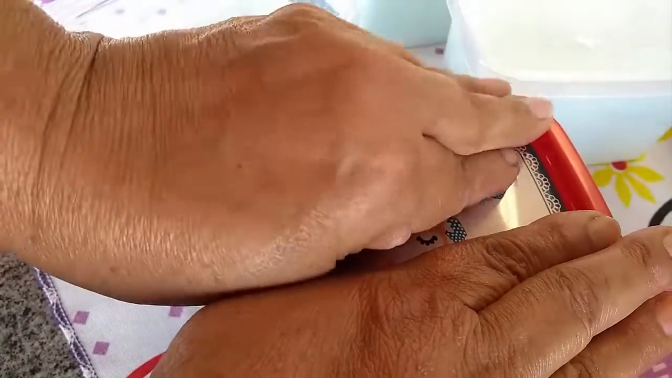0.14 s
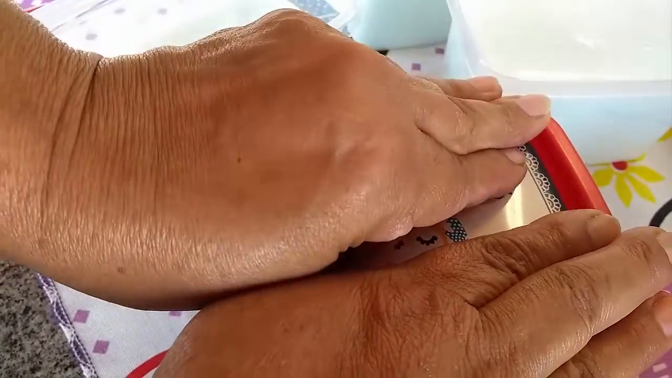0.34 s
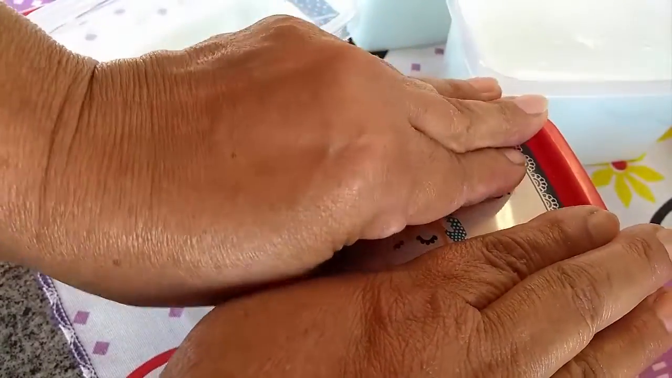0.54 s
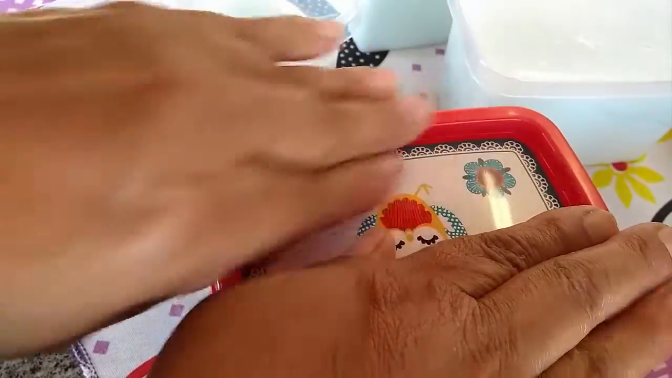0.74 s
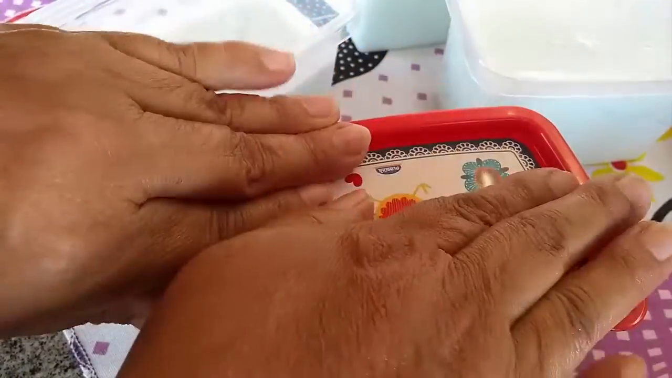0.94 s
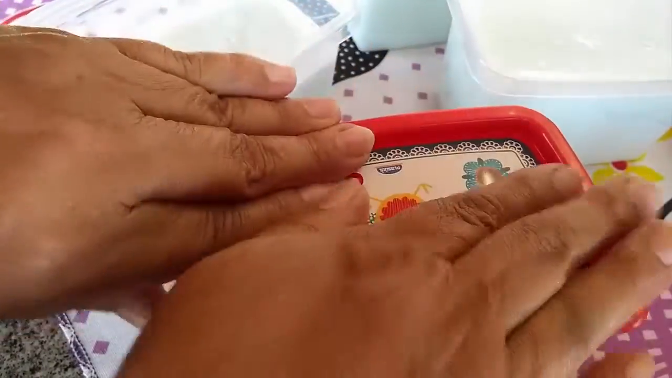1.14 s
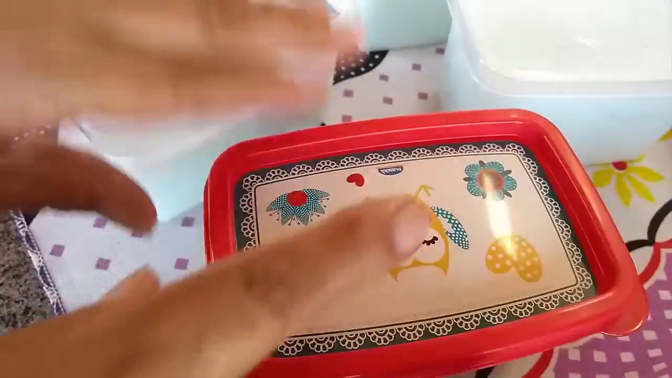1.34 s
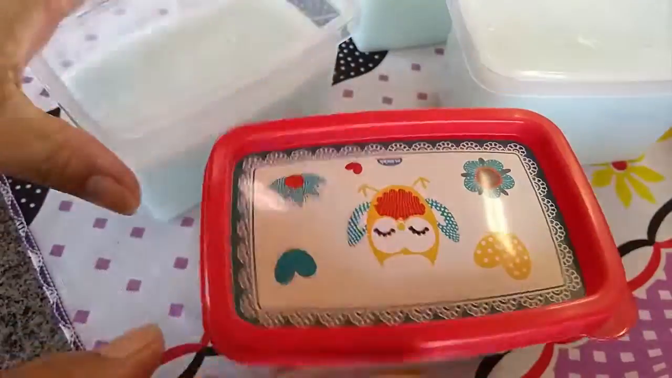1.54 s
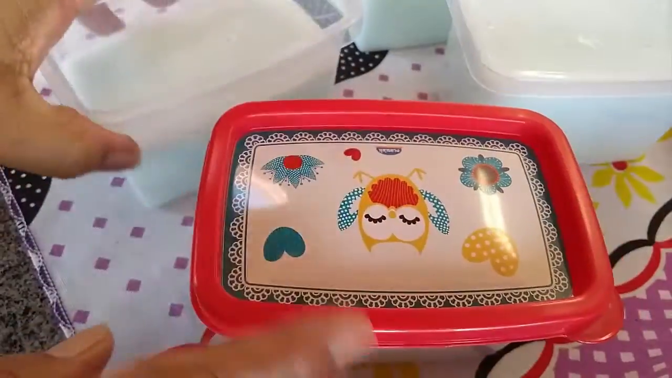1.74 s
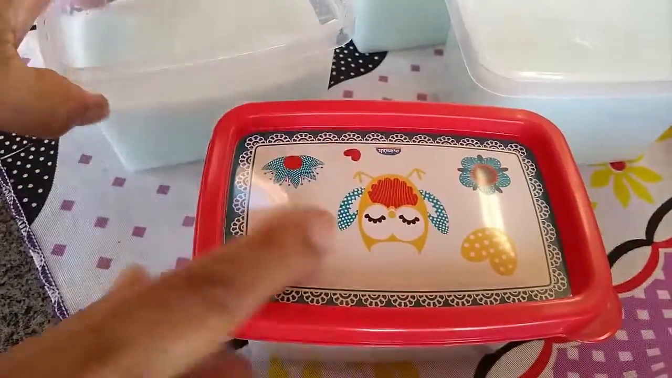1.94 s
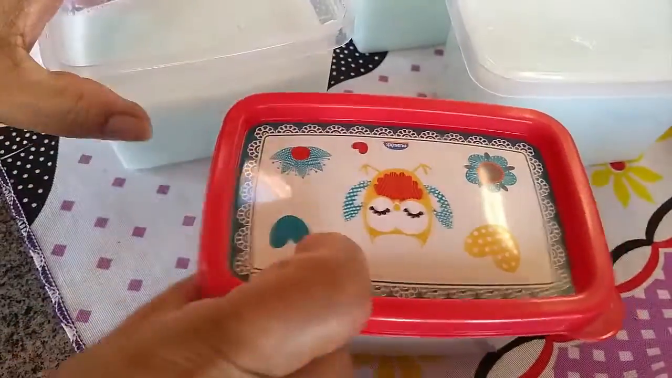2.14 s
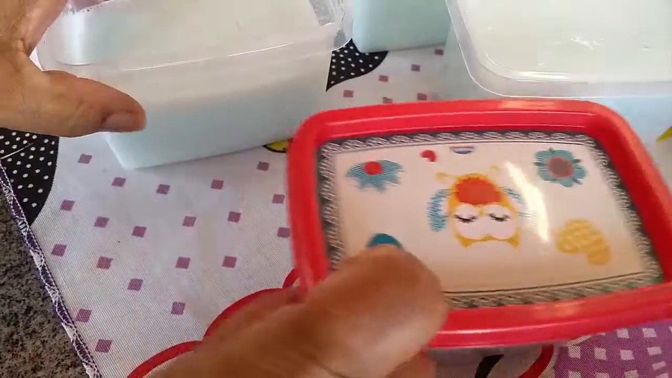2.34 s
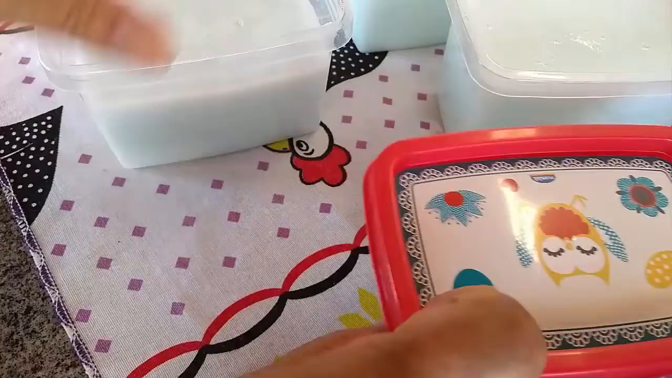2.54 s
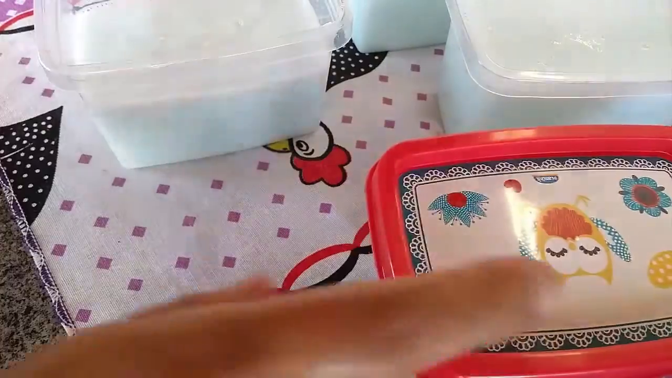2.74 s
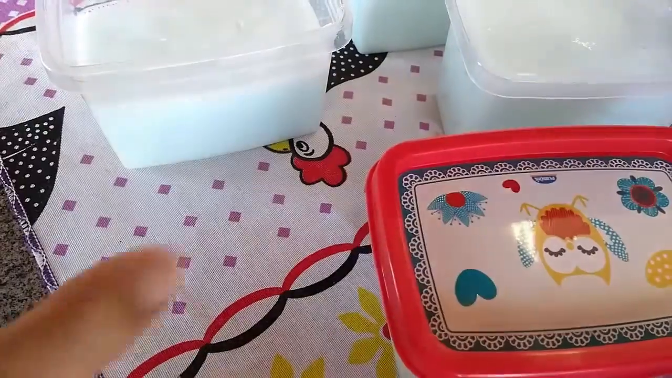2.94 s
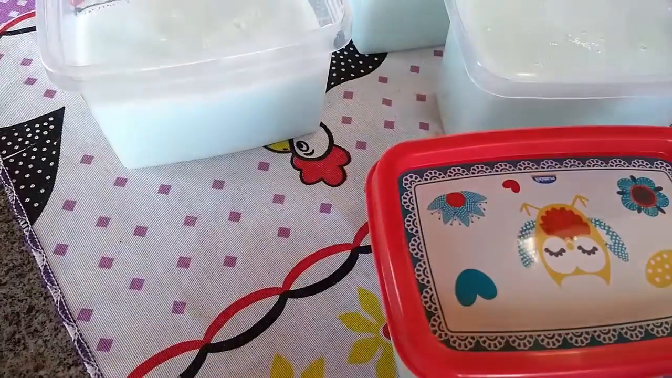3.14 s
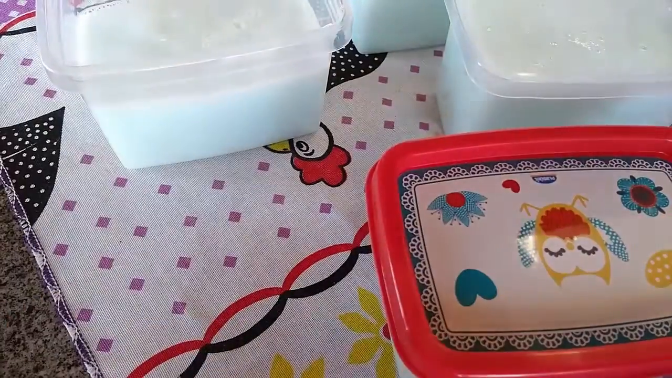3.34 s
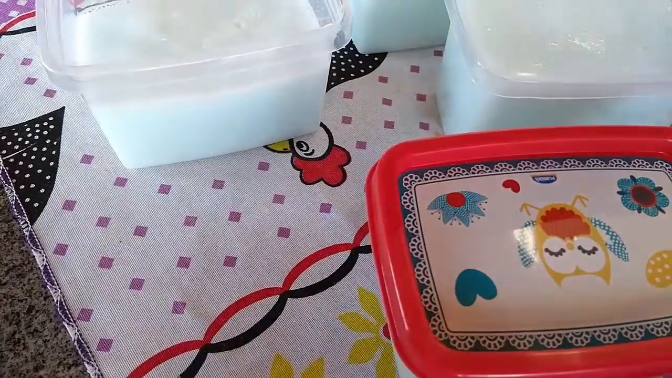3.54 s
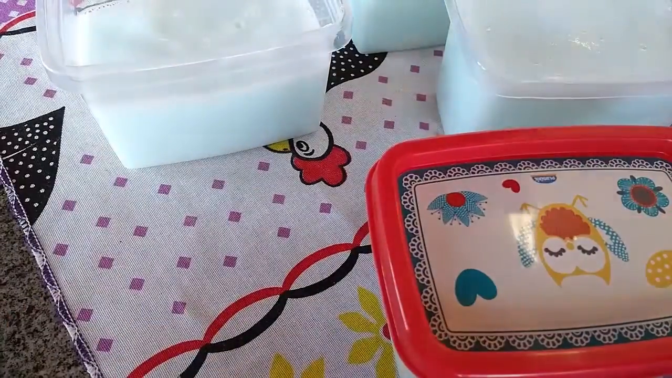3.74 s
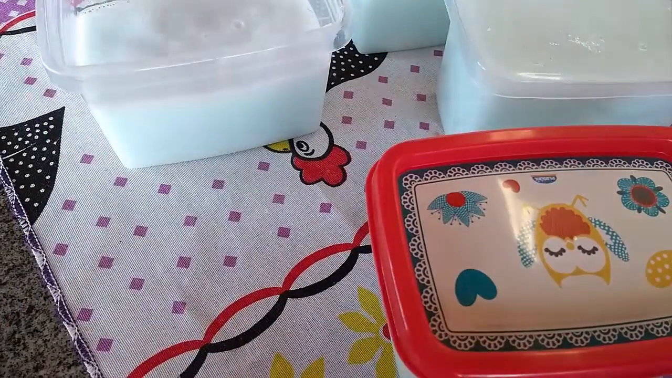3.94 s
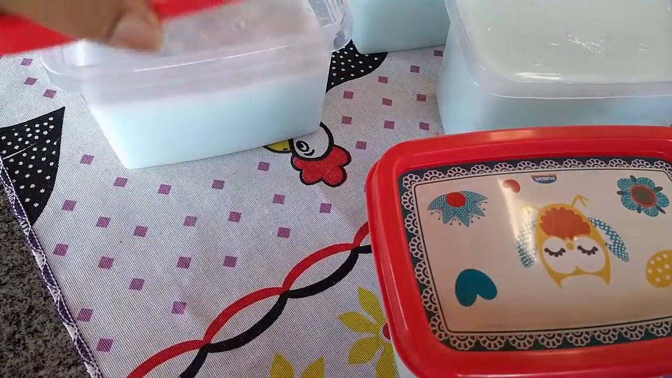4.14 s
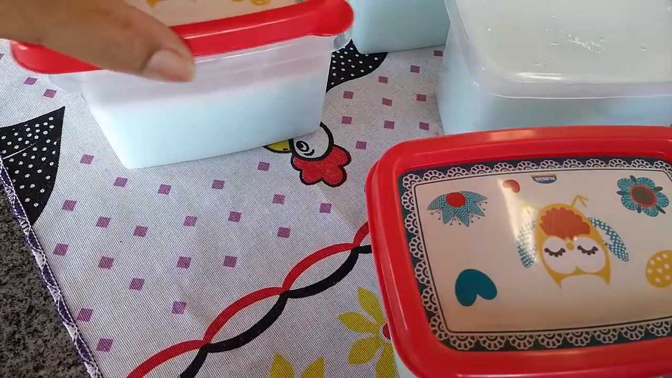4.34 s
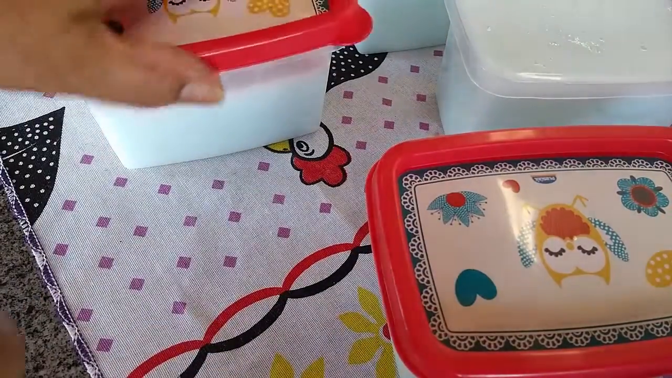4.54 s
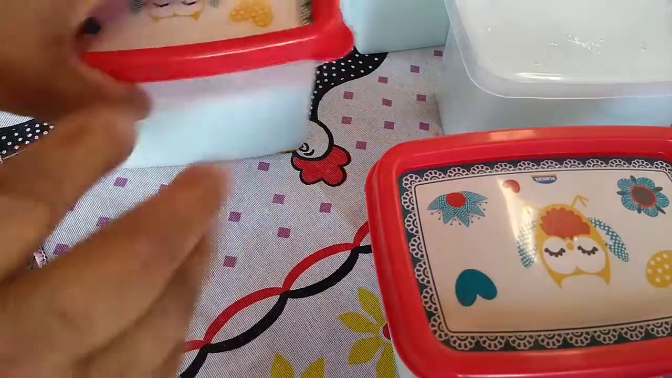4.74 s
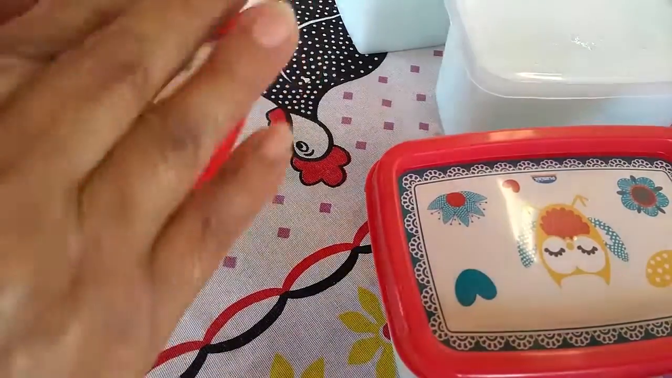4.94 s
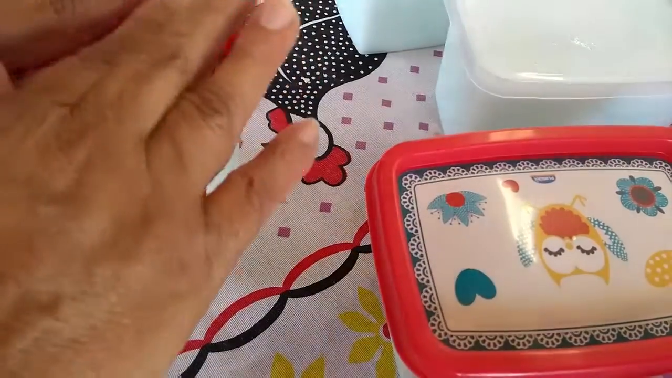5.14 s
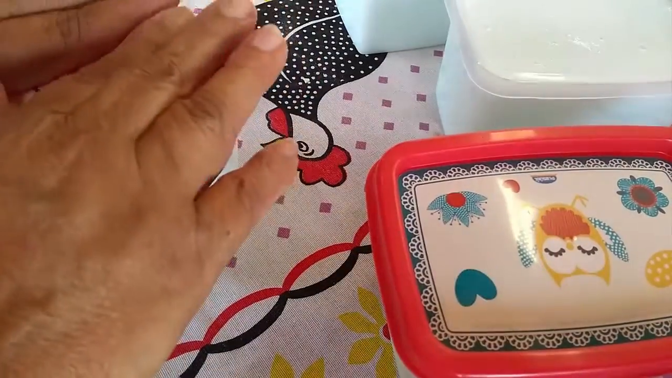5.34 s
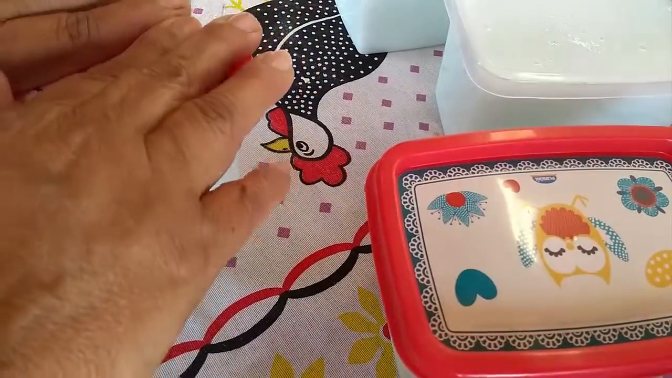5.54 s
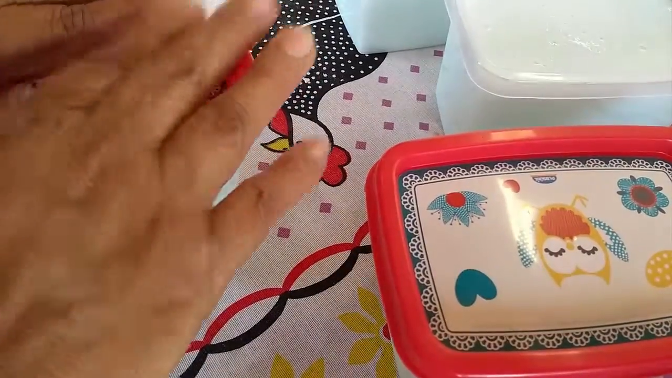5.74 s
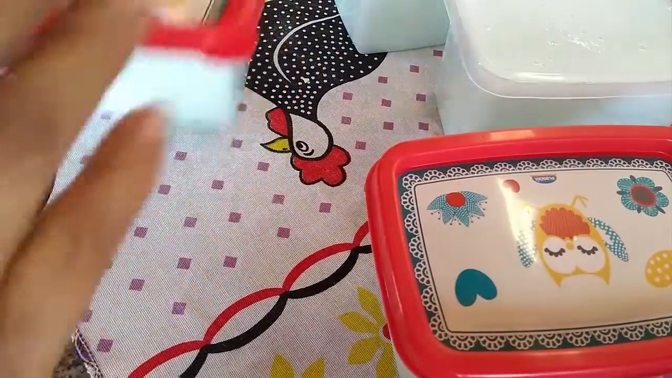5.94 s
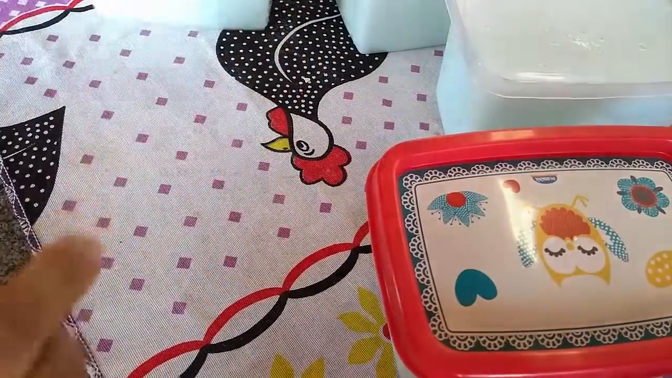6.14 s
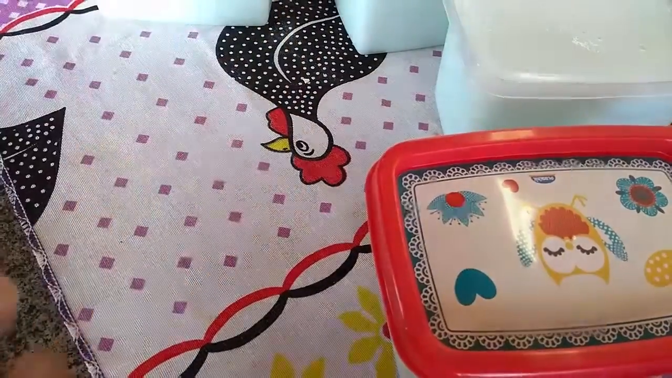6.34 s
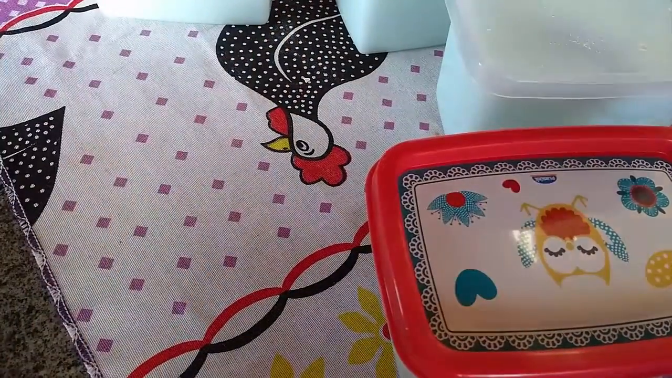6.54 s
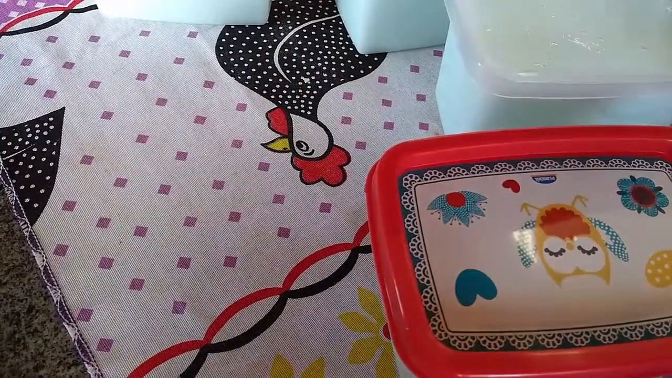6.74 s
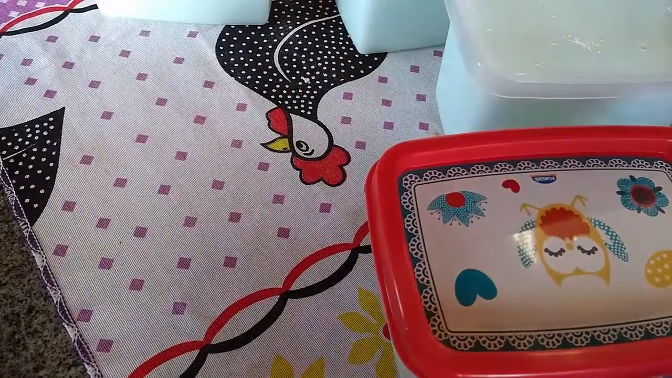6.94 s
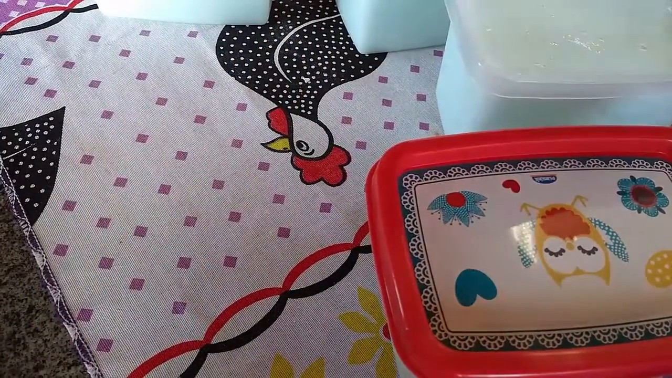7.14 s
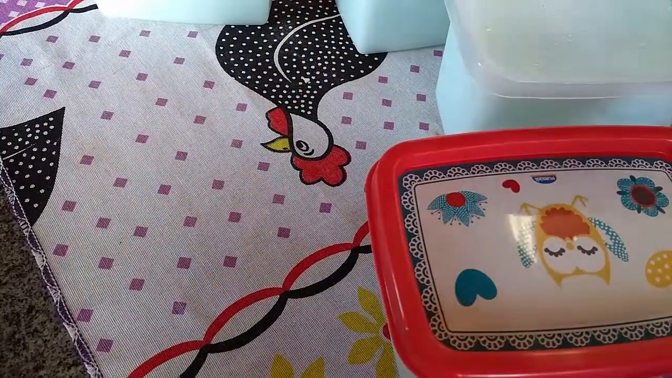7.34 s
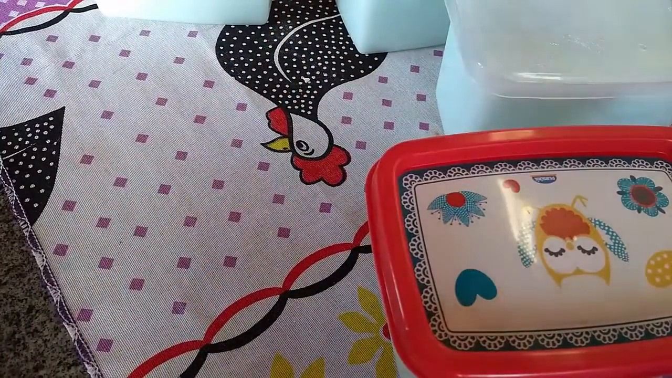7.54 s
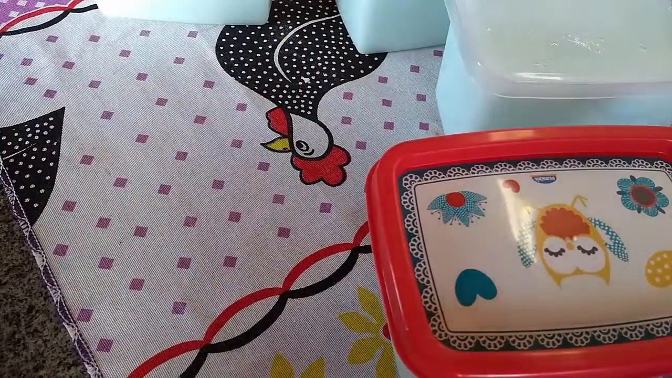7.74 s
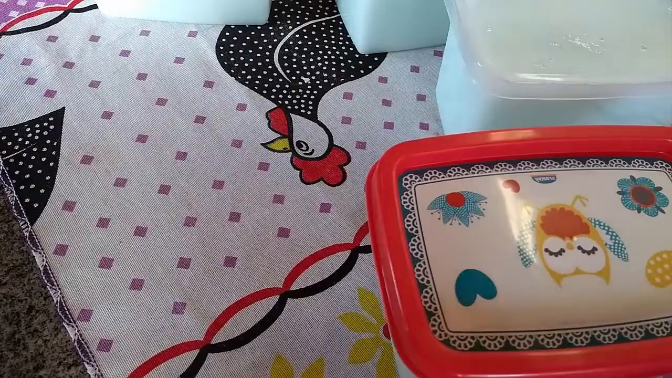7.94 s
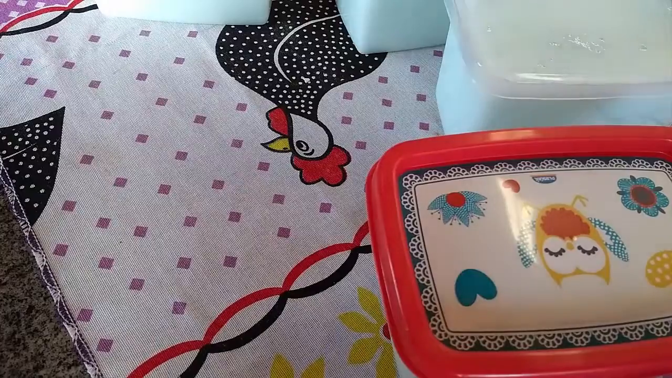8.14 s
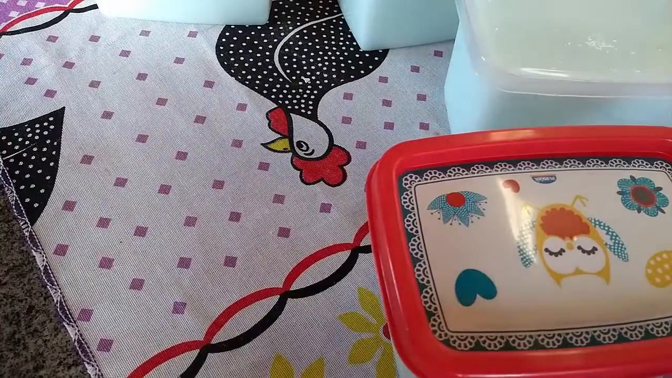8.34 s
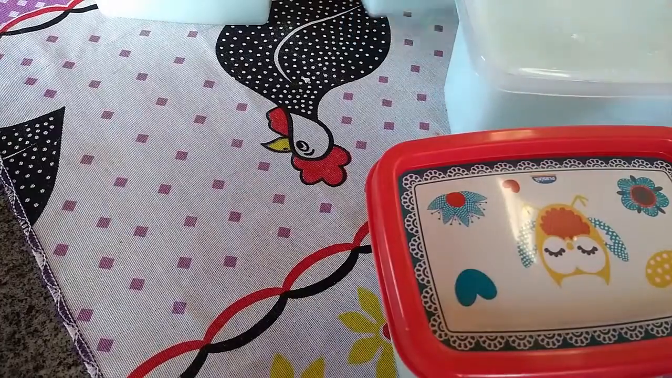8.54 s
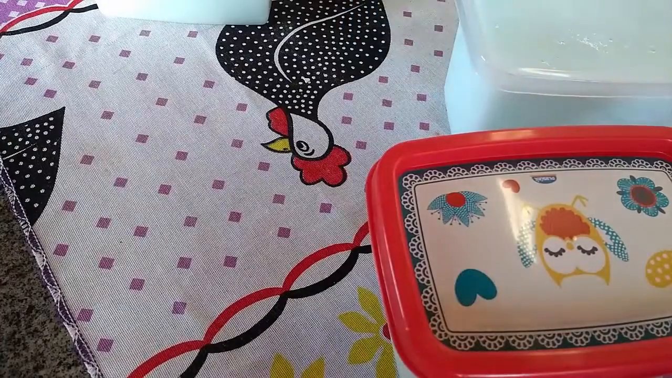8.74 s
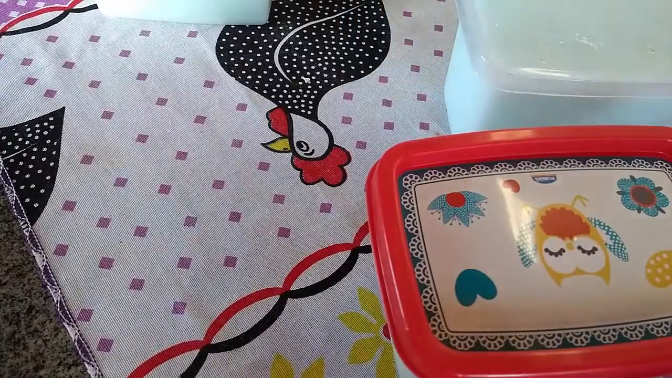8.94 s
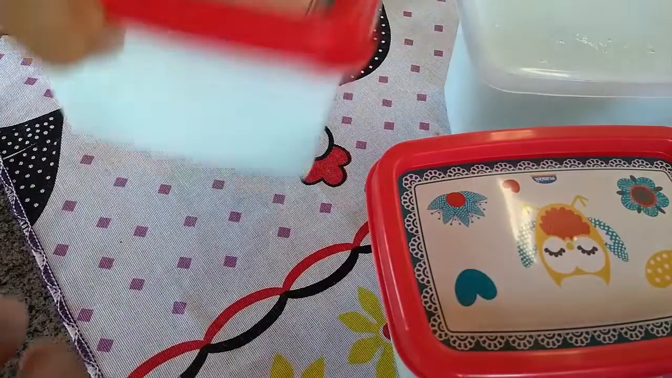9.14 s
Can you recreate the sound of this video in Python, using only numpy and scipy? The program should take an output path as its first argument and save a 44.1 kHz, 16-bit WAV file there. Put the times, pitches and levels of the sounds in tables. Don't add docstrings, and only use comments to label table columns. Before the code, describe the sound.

Close handling of plastic tubs: rims click shut, lids clack and rub, tubs drag on cloth, while a distant engine passes outside.

```python
import sys
import numpy as np
from scipy import signal
from scipy.fft import rfft, irfft, next_fast_len
from scipy.io import wavfile
from scipy.ndimage import uniform_filter1d, map_coordinates

SR = 44100
rng = np.random.default_rng(int(sys.argv[2]) if len(sys.argv) > 2 else 0)


def elevation(decibels):
    levels = np.asarray(decibels, float)
    return 10 ** (levels / 20)


def int16_out(signal):
    q = np.round(np.clip(np.atleast_2d(signal).T, -1, 1) * 32767)
    wavfile.write(sys.argv[1], SR, q.astype(np.int16))


N = 409688
SIZE = next_fast_len(N)
TIME = np.arange(N) / SR
HZ = np.arange(SIZE // 2 + 1) * SR / SIZE

# time in seconds, lead at the left microphone in ms, left minus right in dB.
HAND_PLACE = [(0, 0.078, 4.5), (.45, 0.16, 6.5), (2.9, 0.21, 0.5), (3.1, -0.18, 6.5), (3.6, -0.31, 7),
              (4.2, 0.2, -1.5), (5, 0.22, 5), (5.9, .19, 0.5), (6.2, -0.011, 3), (6.8, -0.095, -1),
              (7.1, -.17, 0.5), (7.25, 0.22, 2), (7.5, -0.027, 0.5), (7.9, 0.0037, 6.5), (9.3, -0.16, -12)]


def unit(x):
    return x / np.sqrt(np.mean(x ** 2))


def noise(gain):
    phase = 2 * np.pi * rng.random(len(HZ))
    return irfft(gain * np.exp(1j * phase), SIZE)[:N] * np.sqrt(SIZE)


def humps(peaks):
    return sum(elevation(db) / (1 + ((HZ - hz) / width) ** 2) ** 2 for hz, width, db in peaks)


def walk(rate):
    hold = int(SR / rate)
    steps = np.repeat(rng.standard_normal(N // hold + 1), hold)
    return 1.19 * uniform_filter1d(uniform_filter1d(steps, hold), hold)[:N]


def curves(table):
    s, *columns = np.transpose(table)
    return [np.interp(TIME, s, column) for column in columns]


def engine_gear(track, orders):
    hz, level_db = curves(track)
    fade = np.clip(np.minimum(TIME - track[0][0], track[-1][0] - TIME) / 0.13, 0, 1)
    turn = 2 * np.pi * np.cumsum(hz * (1 + 0.0022 * walk(4.98))) / SR
    mic_lag = np.array([[0], [.25]])
    out = 0
    for multiple, order_db in orders:
        gain = elevation(level_db + 7.0 + order_db + 2.0 * walk(6))
        out = out + gain * np.sin(multiple * (turn - mic_lag))
    return fade * out


def engine():
    # time in seconds, strongest order in Hz, level in dB.
    pull = [(3.3, 138, -87), (3.45, 139, -70.5), (3.8, 139.3, -71), (4, 140.5, -64), (4.3, 141.5, -67),
            (4.62, 142, -65.5), (4.73, 140, -72), (4.82, 131, -76), (4.9, 127, -73)]
    cruise = [(4.9, 123.7, -74), (5.1, 120.6, -59), (5.6, 121.9, -67.5), (6, 121.8, -71.5),
              (6.47, 123.2, -64), (6.7, 122, -76)]
    # multiple of the strongest order, level in dB.
    pull_orders = [(.5, -4), (1, 10.5), (2, -15), (6, -11), (6.5, -5)]
    cruise_orders = [(1, 2), (1.5, 0), (2, -19)]
    return engine_gear(pull, pull_orders) + engine_gear(cruise, cruise_orders)


def street():
    # frequency in Hz, density in dB per Hz.
    spectrum = [(30, -14), (60, -5.5), (90, 1), (150, -4.5), (260, -2.5), (400, -5), (550, -15), (850, -15),
                (1100, -18.5), (1800, -21.5), (2400, -28), (5000, -33), (9000, -39.5), (14200, -42.5),
                (15000, -70)]
    # frequency in Hz, width in Hz, level in dB.
    air_modes = [(142.8, 13.3, 5.5), (252.7, 39.6, 0.5)]
    # time in seconds, level in dB.
    traffic = [(.3, 1.9), (.9, -5.5), (1.3, 0.77), (1.9, 0), (2.45, 4.5), (2.75, 0.2), (3.44, 3.5),
               (3.7, 1.5), (4.4, 0.5), (4.75, -1), (5.3, 9.5), (5.7, 8), (6.15, 6), (6.8, 1.5), (7.4, 1.5),
               (8.3, 6), (8.6, -1.5), (9.29, -5.5)]
    # start in seconds, depth in dB.
    ducks = [
        (0.559, -9),
        (5.6, -9.5),
    ]

    attack_s, hold_s, release_s = 0.049, 0.31, 0.91
    duck_times = np.cumsum([0, attack_s, hold_s, release_s])
    duck_db = sum(np.interp(TIME, s + duck_times, [0, db, db, 0]) for s, db in ducks)
    traffic_db = curves(traffic)[0]
    # level in dB, dB gained per dB of traffic
    ranges = ((-60, 0.48), (-55.5, 0.63), (-54, 0.63))
    swell_db = np.array([db + follow * traffic_db + duck_db for db, follow in ranges])

    hz, density_db = np.transpose(spectrum)
    shape = elevation(np.interp(np.log(HZ + 1), np.log(hz), density_db)) * (1 + humps(air_modes))
    travel_s = 0.38 / 1000
    alike = np.clip(0.86 * np.sinc(2 * HZ * travel_s) + 0.0065, -.99, .99)
    out = 0
    for k in range(9):
        octave = np.clip(np.log2((HZ + 1) / 50) - k, -1, 1)
        band = shape * np.cos(octave * np.pi / 2)
        mid = noise(band * np.sqrt(1 + alike))
        side = noise(band * np.sqrt(1 - alike))
        share = np.array([np.interp(k, [3, 4.5, 6], row) for row in np.eye(3)])
        db = share @ swell_db + .9 * walk(3) + 1.1 * walk(14)
        out = out + elevation(db) * np.array([mid + side, mid - side])
    return out * elevation(19.5)


def room(x):
    t60_s, top_t60_s, level_db = .3, .2, -20.5
    t = TIME[:SR // 2]
    cloud = rng.standard_normal((2, len(t)))
    low = signal.lfilter([.2], [1, -.93], cloud)
    tail = low * elevation(-60 * t / t60_s) + .33 * (cloud - low) * elevation(-60 * t / top_t60_s)
    tail *= np.clip(t / .005, 0, 1)
    tail /= np.sqrt(np.sum(tail ** 2, 1, keepdims=True))
    return elevation(level_db) * signal.fftconvolve(x, tail, axes=1)[:, :N]


def rubbing():
    # hardest rub in seconds, seconds to rise 20 dB, seconds to fall 20 dB,
    # scrape in dB, rasp in dB re scrape.
    swipes = [(0.002, -9.5, -0.04, -47.5, -11), (.185, .08, .17, -58, -8), (.69, -0.14, 0.1, -65, -16),
              (.724, .035, 0.5, -79, 3), (.865, -0.2, -0.2, -68, 1), (.888, 0.05, 0.15, -67, -6),
              (.922, -0.3, -0.8, -73, -2), (1.51, 0.0461, 0.06, -57, 3), (1.935, 0.2, -0.06, -65.5, -5.5),
              (1.975, 0.08, 0.02, -53, 1), (2.205, 0.1, 0.13, -65, -22), (2.272, -0.12, 0.03, -53.5, -14),
              (2.35, 0, -0.12, -59, -17), (2.55, 1.2, 0.64, -65.5, -2.5), (2.688, 0.2, -0.9, -66, -35),
              (6.953, .022, .03, -51, -13), (7.013, .05, 0.1, -60.5, 0), (7.07, 0.2, 0.19, -63.5, -6.5),
              (8.052, -0.06, .07, -54, -8), (8.15, -5, .11, -61, -10)]
    brushes = [(4.655, .09, .11, -57, .6), (7.27, .011, .035, -68, 12), (7.476, .045, .022, -68, 7),
               (7.549, .006, .03, -68, 9), (8.255, .07, .06, -57, -8), (8.31, .014, .035, -60, 0)]
    drags = [(.412, -0.04, 0.0446, -48, -2), (3.238, 0.0272, 0.06, -47, -4), (3.285, 0.1, 0.08, -66, -3),
             (3.36, 0.01, 0.02, -57.5, -1), (4.338, -0.04, 0.15, -52, -8.5),
             (4.445, 0.0351, 0.14, -46, -13), (4.505, 0.02, 0.0841, -47.5, -8.5),
             (5.0, -1.4, 0.8, -73.5, 3), (5.168, -0.11, 0.44, -55, -11.5), (5.275, -0.11, -0.07, -49, -33),
             (6.24, 1, 0.7, -73.5, -27), (6.3, 0.22, 0.09, -60.5, -11.5), (6.975, 0.035, .17, -52, -14.5)]
    # frequency in Hz, width in Hz, level in dB.
    tub_scrape = [(450, 920, -10.5), (714, 330, 1.5), (890, 72, -1), (1530, 600, -9)]
    lid_scrape = [(500, 420, -3), (946, 480, 1), (1410, 400, -2), (1794, 350, -1)]
    rasp = [(2920, 1100, -10), (2930, 440, 0.5), (4180, 2150, -3)]
    hiss = [(6840, 3000, -6.5), (8940, 2700, -18.5), (12370, 2300, -8.5)]

    gains = np.zeros((4, N))
    # rubs, scraped body, hiss in dB re rasp
    for rubs, body, hiss_db in ((swipes, 1, -6.5), (brushes, 1, 1.5), (drags, 0, -8)):
        for s, rise_s, fall_s, db, rasp_db in rubs:
            span = slice(max(int((s - 1) * SR), 0), int((s + 1) * SR))
            t = TIME[span] - s
            away = np.where(t < 0, -t / max(rise_s, .003), t / max(fall_s, .003))
            press_db = -20 * away ** 1.35
            levels_db = [db, db + rasp_db, db + rasp_db + hiss_db]
            gains[[body, 2, 3], span] += elevation(np.add.outer(levels_db, press_db))
    gains *= unit(elevation(.7 * walk(60) + 2.2 * walk(300)))

    groups = np.array([unit(noise(humps(p))) for p in (tub_scrape, lid_scrape, rasp, hiss)])
    shared, left, right = (np.sum(gains * np.roll(groups, k * N // 3, 1), 0) for k in range(3))
    lead_ms, pan_db = curves(HAND_PLACE)
    late = map_coordinates(shared, [np.arange(N) - lead_ms * SR / 1000], order=3)
    left_mic = (shared + 0.91 * left) * elevation(pan_db / 2)
    right_mic = (late + 1.18 * right) * elevation(-pan_db / 2)
    return np.array([left_mic, right_mic])


def slip_train(build_ms, rattle_ms, share):
    t_ms = (TIME[:1100] - .01) * 1000
    envelope = np.exp(np.where(t_ms < 0, t_ms / build_ms, -t_ms / rattle_ms))
    slips = share * envelope * np.clip(rng.standard_normal(1100) ** 3, -5, 5)
    slips[441] = 1
    return slips


def ring(modes, chance):
    t = TIME[:2048]
    hz, t60 = np.transpose(modes)[:, :, None]
    common, mics, detune = np.split(chance[:, :len(modes)], [1, 3])
    weight = elevation(2 * common + 2 * mics) * (hz[0] / hz[:, 0]) ** 0.13
    tones = np.sin(2 * np.pi * hz * (1 + 0.065 * detune.T) * t) * elevation(-60 * t / t60)
    limits = [0.77 * hz.min(), 1.4 * hz.max()]
    return signal.sosfilt(signal.butter(2, limits, "band", fs=SR, output="sos"), weight @ tones)


def struck(slips, levels_db, ring_hz, pitch):
    # frequency in Hz, t60 in seconds.
    rim = [(1500, 0.0019), (1850, 0.011), (2250, 0.013), (2700, 0.019), (3200, 0.013), (3800, 0.0029),
           (4300, 0.0013), (5000, 0.00053)]
    thump = [(150, 0.044), (230, 0.047), (310, 0.0234), (400, 0.024)]
    walls = [(470, 0.014), (580, 0.0083), (700, 0.029), (830, 0.04), (980, 0.0044), (1150, 0.022)]

    walls = np.multiply(walls, [pitch, pitch ** -3])
    chance = rng.standard_normal((3, 4, 10))
    octaves = np.log2(np.array(rim)[:, 0] / ring_hz)
    chance[0, 0, :len(rim)] += 4.1 / (1 + (octaves / 0.75) ** 2)
    parts = [signal.fftconvolve(ring(modes, z), slips[None], axes=1)
             for modes, z in zip((rim, thump, walls), chance)]
    crack = np.abs(slips) * rng.standard_normal((2, 1100)) + .5 * slips
    treble = signal.butter(3, [5500, 14500], "band", fs=SR, output="sos")
    parts.append(np.pad(signal.sosfilt(treble, crack), ((0, 0), (0, 2047))))
    return sum(elevation(db) * p / np.abs(p).max(1, keepdims=True) for p, db in zip(parts, levels_db))


def hits():
    # time in seconds, lid peak in dB, then thump, tub and crack in dB re lid.
    snaps = [
        (0.4012, -17.5, -17.5, -6, -21.5),
        (0.8847, -53, -3, -16.5, -19),
        (1.006, -53, -14, -2.5, -28.5),
        (2.2495, -51, -16, -9, -20.5),
        (4.4338, -49, -8, 7, 6),
        (4.4939, -29, -12, 6, -15),
        (4.5228, -41, -1, 0, -19),
        (5.1913, -39.5, -9, 2, -17),
        (6.3001, -58, 12, 3, 4),
    ]
    corner_snaps = [
        (0.4848, -13.5, -21, -9.5, -12),
        (5.1753, -45.5, 9.5, -16, -21),
        (5.3079, -20.5, -7, -1, -7.5),
        (5.408, -29, -31, -8, -21.5),
        (5.5774, -15.5, -12.5, -3.5, -13),
    ]
    knocks = [
        (1.236, -44, -31, -9.5, -18),
        (4.4094, -51.5, -6, 8, 2),
        (4.9781, -57, 24.5, -3, -12),
        (5.1136, -46.5, 4, -0.5, -11),
        (6.2238, -60.5, 26.5, 8, -16),
        (6.279, -66.5, 24, 3, -16),
        (7.9102, -37.5, -9, -0.5, -11),
        (8.511, -58, -11, 3, 3),
    ]
    corner_knocks = [
        (3.3441, -32, -20, -9, -20),
        (3.3811, -39, -26, -3, -20),
        (5.16, -38, -5.5, -11, -3.5),
        (5.2814, -30, 3, 1, -8),
        (5.4925, -24, 4, -2, -9),
    ]
    # time in seconds, lid peak in dB, tub in dB re lid.
    touches = [(0.1059, -54, 6), (0.9197, -61, 3.5), (2.0638, -52, 7), (2.0931, -61, 10.5),
               (3.2235, -52, -14), (4.7286, -59.5, 8.5), (5.6537, -58, -8), (5.7588, -63.5, 10),
               (5.8585, -55.5, -2), (7.9553, -52, 2), (8.1544, -69, 0), (8.3023, -56, 6.5)]
    # time in seconds, lid peak in dB, then thump, panel and crack in dB re lid.
    clacks = [(3.231, -27.5, -15.5, 2, -21), (3.2444, -24.5, -28, -3, -24.5), (3.33, -47, -21, -12, -15),
              (4.315, -30, -20.5, -7.5, -19.5), (4.3284, -32.5, -28, 3.5, -12),
              (6.9613, -34.5, -27, 4.5, -29), (7.0605, -36.5, -16, 2.5, -22), (7.9697, -46, -18, 1, -28),
              (8.0456, -49.5, 1, 5, -18)]

    taps = [(s, db, -11, tub_db, -35) for s, db, tub_db in touches]
    flat_hz, corner_hz = 1560, 3340
    # events, ring Hz, build-up ms, rattle ms, size of slips, samples ahead of the onset, panel pitch
    kinds = [(snaps, flat_hz, 1.6, .8, .12, 375, 1),
             (corner_snaps, corner_hz, 1.6, .8, .12, 375, 1),
             (knocks, flat_hz, .1, 3.2, .25, 441, 1),
             (taps, flat_hz, .1, 3.2, .25, 441, 1),
             (corner_knocks, corner_hz, .1, 3.2, .25, 441, 1),
             (clacks, flat_hz, .1, 2.86, .13, 441, 1.3)]
    out = np.zeros((2, N + 4096))
    lead_ms, pan_db = curves(HAND_PLACE)
    for events, ring_hz, build_ms, rattle_ms, share, early, pitch in kinds:
        for s, rim_db, thump_db, body_db, crack_db in events:
            slips = slip_train(build_ms, rattle_ms, share)
            hit = struck(slips, (0, thump_db, body_db, crack_db - 3.0), ring_hz, pitch)
            i = int(s * SR)
            for mic, sign in enumerate((1, -1)):
                j = int(round(i - early - sign * lead_ms[i] * SR / 2000))
                out[mic, j:j + hit.shape[1]] += hit[mic] * elevation(rim_db + 4.5 + sign * pan_db[i] / 2)
    return out[:, :N]


def scene():
    background = engine() + street()
    near = rubbing() + hits()
    return background + near + room(near)


def band_limit(x):
    return signal.sosfilt(signal.butter(12, 16500, fs=SR, output="sos"), x)


def record(dry):
    late_s, gain, dull_hz = 0.396 / 1000, 0.62, 4700
    cross = gain * np.exp(-2j * np.pi * HZ * late_s) / np.sqrt(1 + (HZ / dull_hz) ** 2)
    wide = dry - irfft(rfft(dry[::-1], SIZE) * cross, SIZE)[:, :N]
    wide[1] += 0.31 * np.diff(wide[1], prepend=0)
    top = signal.butter(6, 15300, fs=SR, output="sos")
    return band_limit(signal.sosfilt(top, wide))


dry = scene()
out = record(dry)
int16_out(out)
```